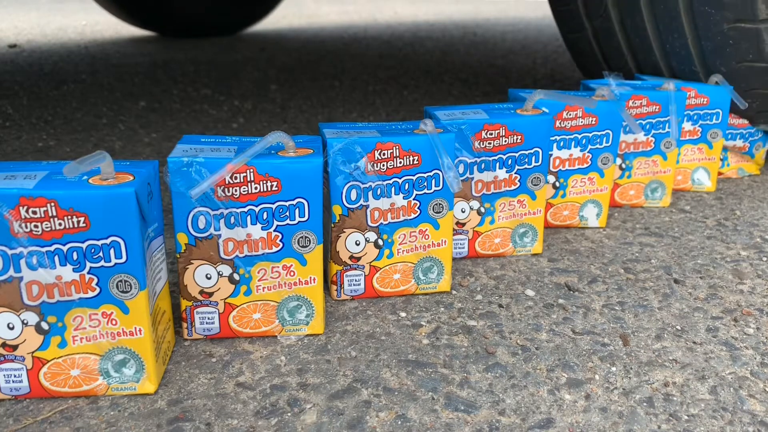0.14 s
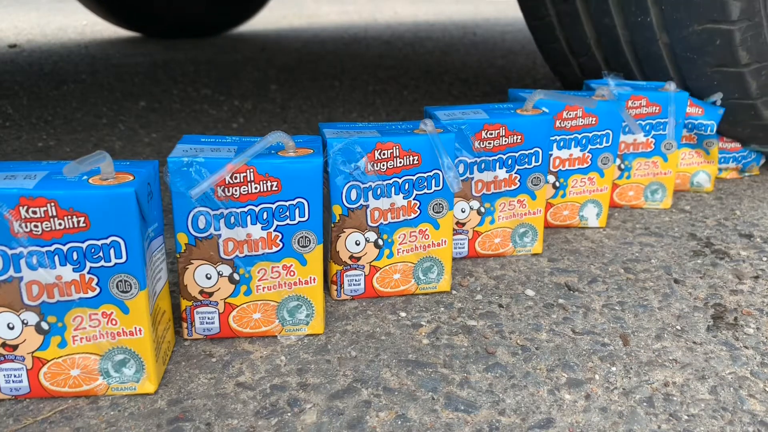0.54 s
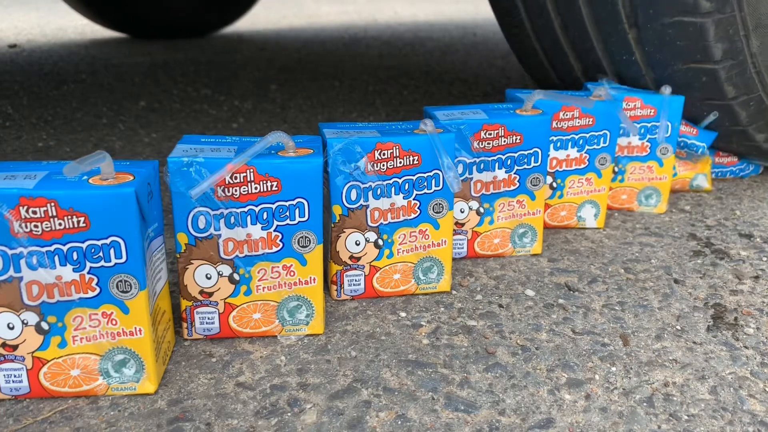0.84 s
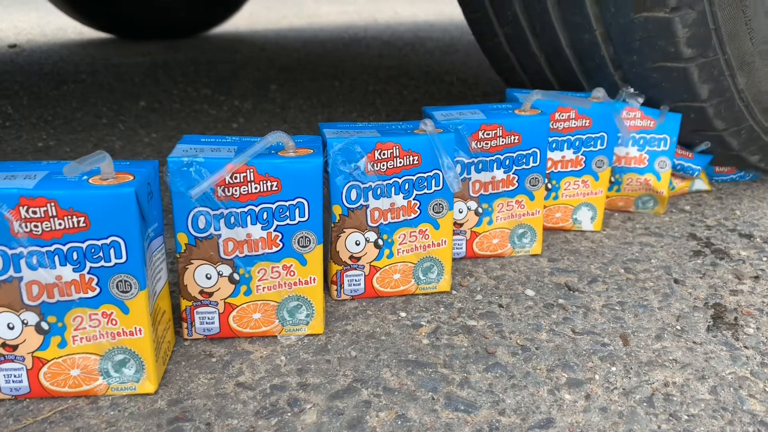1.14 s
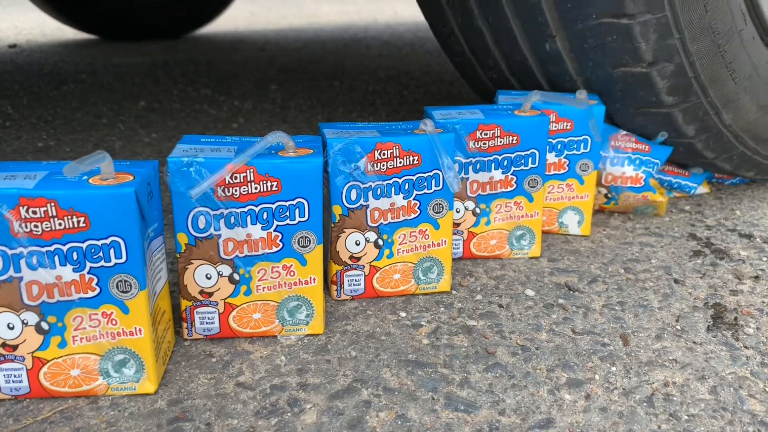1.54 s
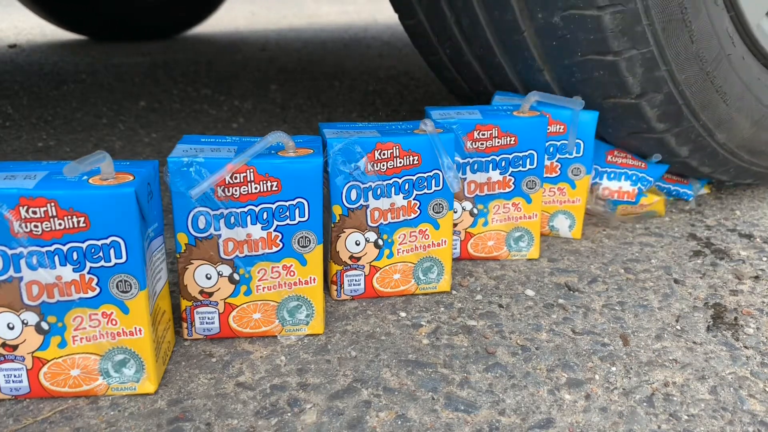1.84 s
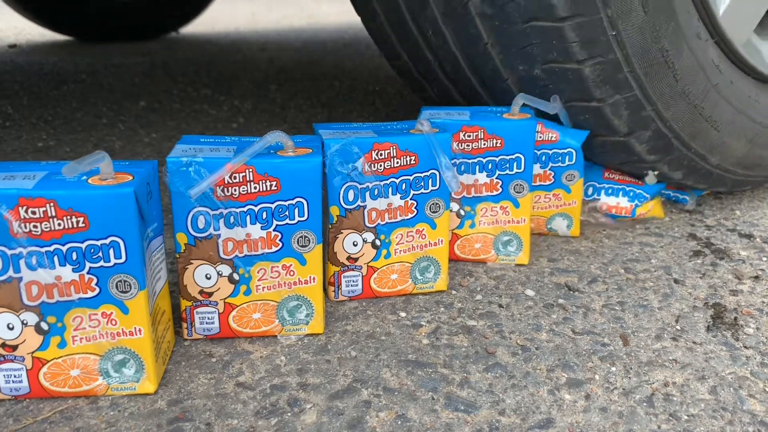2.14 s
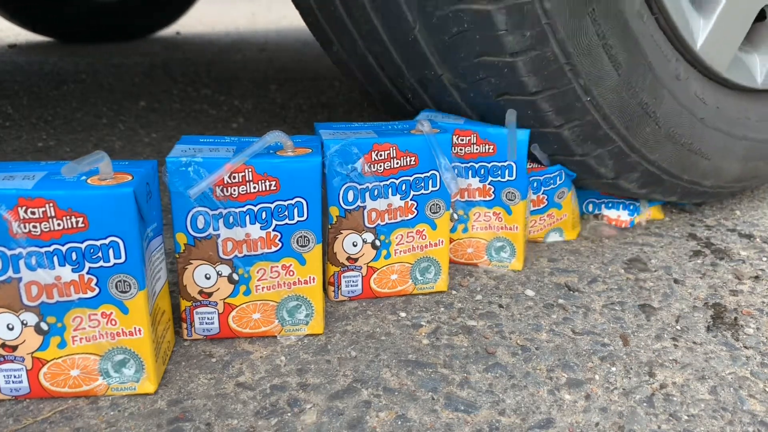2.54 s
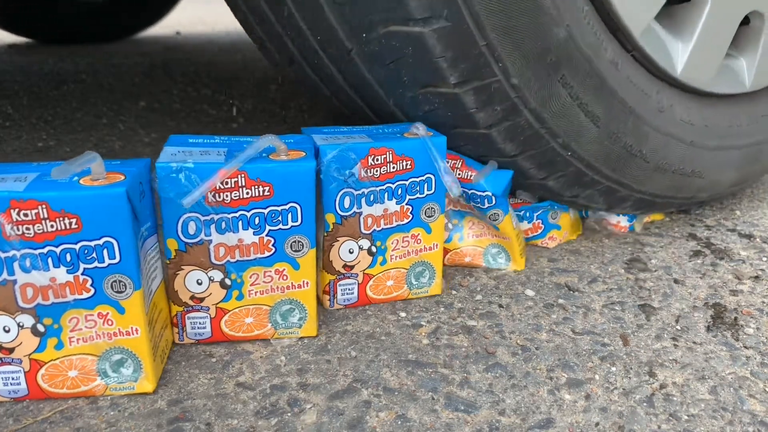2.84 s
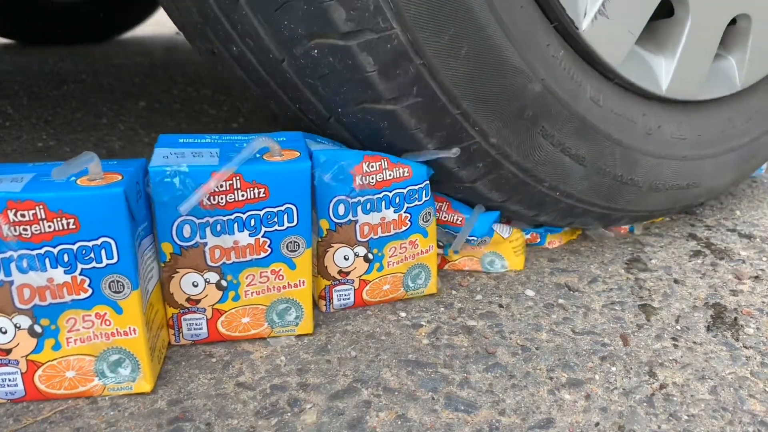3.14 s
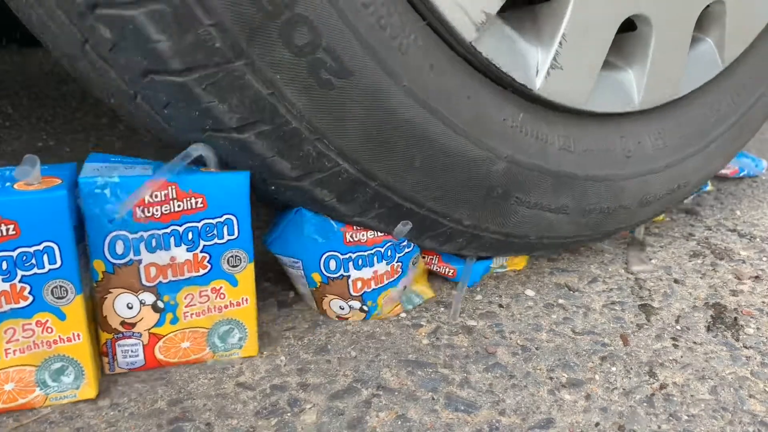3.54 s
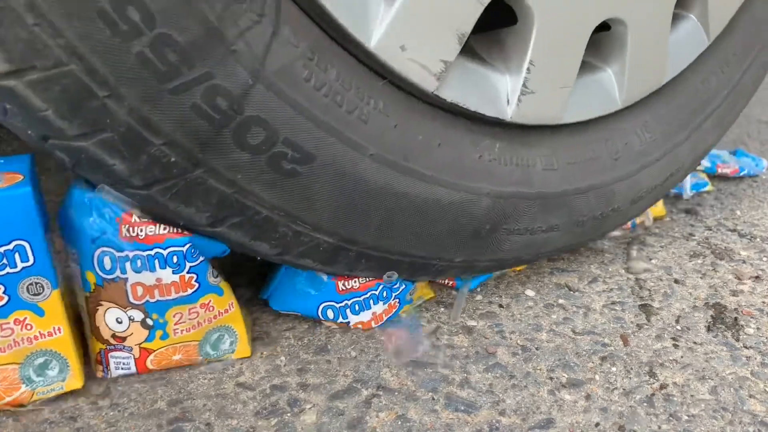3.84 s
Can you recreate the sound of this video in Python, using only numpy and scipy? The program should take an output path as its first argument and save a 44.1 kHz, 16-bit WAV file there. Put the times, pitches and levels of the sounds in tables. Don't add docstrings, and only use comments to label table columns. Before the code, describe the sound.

A car tyre creeps over full drink cartons on asphalt, close in stereo. Light crackles and hollow pops come first, then a quieter hissing lull, then louder bursts, sharp snaps and squirting juice, over faint street rumble.

```python
import sys
import numpy as np
from scipy import signal
from scipy.fft import rfft, irfft, next_fast_len
from scipy.io import wavfile
from scipy.ndimage import uniform_filter1d

SR = 44100
rng = np.random.default_rng(int(sys.argv[2]) if len(sys.argv) > 2 else 0)


def to_wav(sig):
    pcm = np.clip(np.atleast_2d(sig), -1, 1) * 32767
    pcm = np.round(pcm).astype(np.int16)
    wavfile.write(sys.argv[1], SR, pcm.T)


def invert_db(level):
    return 10 ** (np.asarray(level, dtype=float) / 20)


N = 176400

# frequency in Hz, level in dB.
JET_SPECTRUM = [(800, -2.5), (1500, 1), (2500, 4), (4000, 2.5), (6000, 1), (9000, 0.5), (13000, -5.5),
                (16000, -1.5)]


def rms_one(x):
    return x / np.sqrt(np.mean(x ** 2) + 1e-20)


def in_time(rows):
    s, *columns = np.transpose(rows)
    return [np.interp(np.arange(N) / SR, s, column) for column in columns]


def at_hz(points, hz):
    table_hz, values = np.array(points).T
    return np.interp(np.log(np.maximum(hz, 1)), np.log(table_hz), values)


def drift(rate):
    pole = np.exp(-40 * np.pi * rate / SR)
    white = rng.standard_normal(N // 20 + 3002)
    slow = signal.lfilter([1], [1, -2 * pole, pole * pole], white)[3000:]
    return np.interp(np.arange(N) / 20, np.arange(len(slow)), rms_one(slow))


def ring(clicks, hz, t60):
    radius = invert_db(-60 / (max(t60, 1e-3) * SR))
    w = 2 * np.pi * min(hz, 17000) / SR
    return signal.lfilter([0, np.sin(w)], [1, -2 * radius * np.cos(w), radius * radius], clicks + 1e-18)


def band(x, low_hz, high_hz):
    return signal.sosfilt(signal.butter(2, [low_hz, high_hz], "band", fs=SR, output="sos"), x)


def bank(low_hz, count, octaves, gain_db, patchy_db, rate, source=None):
    edges = low_hz * 2 ** (octaves * np.arange(count + 1))
    shared = drift(rate)
    if source is None:
        source = rng.standard_normal((2, N))
    out = 0
    for k in range(count):
        low, high = edges[k], edges[k + 1]
        flicker = patchy_db * (0.86 * shared + 1.44 * drift(rate * 0.75))
        out = out + invert_db(gain_db(np.sqrt(low * high)) + flicker) * band(source[k % 2], low, high)
    return out


def bump(hz, centre, octaves, db):
    return db * np.exp(-.5 * (np.log2(hz / centre) / octaves) ** 2)


def grains(rate, spread_db):
    sizes = invert_db(spread_db * np.minimum(rng.exponential(1, (2, N)), 4))
    sizes = sizes * rng.choice([-1, 1], (2, N))
    happens = rng.random((2, N)) < rate / SR
    return rms_one(sizes * happens + 1e-9)


def add(out, s, x):
    i = int(s * SR)
    out[i:i + len(x)] += x[:len(out) - i]


def street():
    # frequency in Hz, level in dB.
    rumble_spectrum = [(15, -42), (25, -62), (60, 8), (199, -7), (430, 6), (493, -5.5), (1500, -1.5),
                       (1950, -38), (3300, -120)]

    def rumble():
        return rms_one(bank(19.77, count=12, octaves=0.54, gain_db=lambda hz: at_hz(rumble_spectrum, hz),
                            patchy_db=4.5, rate=17.6))

    mid, side = rumble(), rumble()
    return invert_db(-47.5) * (mid + 0.21 * side * np.array([[1], [-1]]))


def jet_colour(hz, nozzle, whistle_db, extra_db=0):
    hiss_db = at_hz(JET_SPECTRUM, hz) + bump(hz, nozzle, octaves=.17, db=8 + extra_db)
    low_whistle_db = whistle_db - 17.0 + bump(hz, nozzle * 0.32, octaves=.22, db=25.9)
    return 10 * np.log10(invert_db(2 * hiss_db) + invert_db(2 * low_whistle_db))


def leak():
    # time in seconds, level in dB, nozzle resonance in Hz, brightness in dB per octave.
    seam_flow = [(0, -55.5, 9970, -4), (.45, -47.5, 9150, 5), (.66, -42, 14300, 2), (.95, -34, 12000, 5),
                 (1.1, -30.5, 12200, 9.5), (1.5, -34, 14000, 5.5), (1.7, -30, 9400, 5),
                 (1.92, -20, 10140, 2), (2.2, -26.5, 13600, 4.5), (2.55, -33.5, 14200, 0),
                 (2.62, -28.5, 10500, 1), (2.86, -20.5, 11500, 11.5), (2.93, -29, 11000, 9.5),
                 (3.11, -23, 13600, 11.5), (3.28, -38, 10300, -5), (3.5, -32, 11000, 4.5),
                 (3.8, -27.5, 11000, 3.5)]
    db, nozzle, tilt = in_time(seam_flow)

    def colour(hz):
        return jet_colour(hz, nozzle, whistle_db=-1.5) + tilt * np.log2(hz / 10000)

    return invert_db(db - 2.0) * bank(1034, count=24, octaves=1 / 6, gain_db=colour, patchy_db=1.5, rate=6)


def crumple():
    # time in seconds, creak level in dB, fold resonance in Hz, film crackle level in dB.
    load = [(0, -107, 475, -62), (.07, -45, 1040, -47), (.3, -35.5, 670, -38), (.5, -52.5, 830, -50),
            (.85, -36, 506, -42), (1.2, -47.5, 403, -47), (1.55, -41, 400, -41.5), (1.75, -56, 780, -34.5),
            (2.08, -50, 980, -30.5), (2.15, -29, 1050, -32.5), (2.5, -42.5, 810, -38.5),
            (2.8, -40, 387, -44), (3.15, -36.5, 886, -29.5), (3.22, -26, 524, -35), (3.5, -35.5, 850, -32),
            (3.66, -37, 1060, -34), (3.77, -37, 550, -32.5), (4, -28.5, 510, -30)]
    creaks_per_s, crackles_per_s = 2500, 700
    creak_db, fold, film_db = in_time(load)
    clump_db = np.minimum(5.0 * drift(25) + 3.7 * drift(120), 8)

    def fold_colour(hz):
        return bump(hz, fold, octaves=0.95, db=12.2) + bump(hz, 1500, octaves=1.0, db=2.03)

    def film_colour(hz):
        return bump(hz, 7150, octaves=0.84, db=10.0)

    creak = bank(131.8, count=14, octaves=1 / 3, gain_db=fold_colour, patchy_db=3.0, rate=25.0,
                 source=grains(creaks_per_s * invert_db(.4 * clump_db), spread_db=2.04))
    crackle = bank(1436, count=10, octaves=0.353, gain_db=film_colour, patchy_db=1.5, rate=90,
                   source=grains(crackles_per_s * invert_db(clump_db), spread_db=4.0))
    return invert_db(creak_db) * rms_one(creak), invert_db(film_db) * rms_one(crackle)


def snaps(rows, top_hz):
    out, t = np.zeros(N), np.arange(SR // 40) / SR
    for s, db, hz in rows:
        burst = rng.standard_normal(len(t)) * invert_db(-60 * t / 0.0095) * np.minimum(t / 0.00014, 1)
        t60 = 16.9 / hz
        x = ring(burst, hz, t60) + 0.072 * ring(burst, hz * 0.41, t60)
        x = x + 1.4 * band(burst, 1100, top_hz)
        add(out, s + 0.00123, invert_db(db) * x / np.abs(x).max())
    return out


def fold_ticks():
    # start in seconds, peak level in dB, pitch in Hz.
    small_folds = [(0.064, -28.5, 1250), (0.083, -30, 1130), (0.1, -37, 727), (0.116, -22, 1290),
                   (0.163, -16, 1220), (0.177, -17, 740), (0.234, -28.5, 720), (0.317, -26, 735),
                   (0.366, -23, 1020), (0.404, -23.5, 1300), (0.412, -31, 1270), (0.436, -39, 1170),
                   (0.521, -26, 745), (0.742, -31, 960), (0.795, -23, 703), (0.903, -27, 2300),
                   (0.953, -28, 1010), (0.997, -5, 820), (1.518, -30.5, 830), (2.12, -24, 3900),
                   (2.145, -28.5, 1060), (2.162, -18.5, 1180), (2.2, -13.5, 1030), (2.232, -18.5, 880),
                   (2.359, -23, 764), (2.488, -26, 1030), (2.57, -12, 767), (2.61, -10, 3500),
                   (3.37, -12, 880), (3.473, -16, 905), (3.529, -26.5, 1020), (3.561, -15, 1170),
                   (3.567, -14, 1095), (3.584, -19, 1230), (3.607, -14, 1210), (3.885, -11.5, 2800),
                   (3.964, -5, 935)]
    return invert_db(-0.5) * snaps(small_folds, top_hz=3000)


def film_prickles():
    # start in seconds, peak level in dB, pitch in Hz.
    small_slips = [(0.0742, -40, 4950), (0.0883, -23, 8020), (0.1999, -27, 7500), (0.246, -23, 9150),
                   (0.297, -27, 8000), (0.374, -25, 5100), (0.4085, -31, 4960), (0.4366, -38, 4510),
                   (0.675, -29, 9190), (0.6923, -26, 6550), (0.7786, -21, 7560), (0.8904, -23, 10700),
                   (0.952, -20, 10000), (1.1534, -30, 12000), (3.9014, -7, 9910)]
    return snaps(small_slips, top_hz=12000)


def film_snaps():
    # start in seconds, peak level in dB, pitch in Hz.
    tears = [(0.132, -19, 6230), (0.1775, -9, 7340), (0.2712, -13.5, 8400), (0.3442, -21, 7500),
             (0.366, -19, 8000), (0.6486, -19, 14000), (0.797, -16.5, 7360), (0.903, -17.5, 8500),
             (0.935, -16, 13900), (1, -15, 12000), (2.3719, -4, 8000), (2.4135, -5.5, 8640),
             (2.573, -1, 11100), (3.0102, 0.5, 11800), (3.5651, -3, 8500), (3.7986, -16, 6600)]
    return snaps(tears, top_hz=11000)


def pops():
    # start in seconds, peak level in dB, hollow pitch in Hz, ring T60 in seconds.
    buckles = [(0.179, -19, 310, 0.083), (0.542, -8.5, 620, 0.015), (0.684, -14, 674, 0.011),
               (0.793, -22, 271, 0.039), (0.993, -13, 308, 0.013), (1.079, -11.5, 664, 0.026),
               (1.32, -25.5, 322, 0.066), (1.61, -22, 440, 0.029), (2.575, -1.5, 670, 0.012),
               (2.663, -6, 764, 0.0073), (2.769, -25, 337, 0.065), (2.906, -2, 794, 0.01),
               (3.18, -17.5, 620, 0.01), (3.315, -16, 750, 0.02), (3.472, -14, 530, 0.014),
               (3.797, -16, 425, 0.063), (3.87, -15.5, 400, 0.085), (3.96, -6, 654, 0.041)]
    # frequency ratio to the hollow pitch, level in dB, share of the ring time.
    wall_modes = [(.5, -11.5, 1.24), (1.0, -2, 1.11), (1.3, -3, 1.05), (2.1, -26, 0.16)]
    out, t = np.zeros(N), np.arange(SR // 5) / SR
    tail_decay = invert_db(-60 * t / .1)
    thud = invert_db(-23 - 60 * t / 0.0317) * np.sin(2 * np.pi * 108 * t)
    for s, db, hz, t60 in buckles:
        a, b = rng.standard_normal((2, len(t)))
        along = np.minimum(t * hz / 2.46, 1)
        sagging = np.sin(2 * np.pi * hz * t * (1.15 - 0.28 * along))
        push = np.sin(np.pi * along) ** 2 * (sagging + .3 * a)
        body = 0
        for k, (ratio, mode_db, share) in enumerate(wall_modes):
            body = body + invert_db(mode_db + 5 * b[k]) * ring(push, hz * ratio, t60 * share)
        tail = invert_db(-13) * tail_decay * along * rms_one(band(b, hz / 2, 2 * hz))
        tail = tail / rms_one(tail_decay)[0]
        crack = invert_db(4.0 - 60 * t / 0.011) * along * rms_one(band(a, 850, 1700))
        add(out, s + 0.00233, invert_db(db) * (body / np.abs(body).max() + tail + thud + crack))
    return out


def squirts():
    # start in seconds, length in seconds, level in dB, nozzle resonance in Hz,
    # low whistle level in dB, body level in dB.
    bursts = [(0.789, 0.0034, -33.5, 9700, -14, 0), (0.99, 0.029, -20, 12900, -34, -3.5),
              (1.144, 0.02, -29, 11100, -24, -41), (2.593, 0.13, -25, 10860, 19, -25),
              (2.754, 0.13, -25.5, 12300, 4, -24), (3.052, 0.16, -30.5, 8460, -18, -37),
              (3.331, 0.01, -21, 11700, -1.5, -23), (3.352, 0.0066, -23, 11600, -5, -12),
              (3.365, 0.11, -22.5, 11000, 4.5, -10), (3.402, 0.014, -15, 11000, 6, -26),
              (3.416, 0.011, -12.5, 9540, 6, -20), (3.855, 0.1, -20, 9300, -27, -20)]
    jet, rush, n = np.zeros(N), np.zeros(N), SR // 4
    t, hz = np.arange(n) / SR, np.fft.rfftfreq(n, 1 / SR) + 1
    splutter = invert_db(2.2 * drift(130))
    body_colour = invert_db(bump(hz, 1130, octaves=1.3, db=20.3))
    for s, length, db, nozzle, whistle_db, body_db in bursts:
        a, b = rng.standard_normal((2, n))
        shape = np.minimum(t / (0.24 * length), 1) * np.exp(-np.maximum(t - length, 0) / .013)
        colour = invert_db(jet_colour(hz, nozzle, whistle_db + 4.5, extra_db=4.5))
        add(jet, s, invert_db(db) * shape * rms_one(irfft(rfft(a) * colour, n)))
        add(rush, s, invert_db(db + body_db + 3.0) * shape * rms_one(irfft(rfft(b) * body_colour, n)))
    return jet * splutter, rush * splutter


def crease_cracks():
    # start in seconds, peak level in dB, pitch in Hz.
    creases = [
        (1.3214, -17.5, 918),
        (3.1832, -4, 1630),
        (3.9004, -8, 1490),
    ]
    return snaps(creases, top_hz=3500)


def ports(cardboard, jets):
    # frequency in Hz, left over right level in dB.
    balance = [(300, -.5), (1050, -6), (1900, 0), (2900, .8), (5500, 4), (6500, 0)]
    # frequency in Hz, phase in turns.
    jet_lead = [(100, .01), (1000, .33), (2400, .5), (3100, .56), (4200, .92), (5600, 1.5), (7000, 2.15),
                (8800, 2.2), (12000, 2)]
    # time in seconds, lag of the left port in ms,
    # left over right level in dB, share of the jets heard from near by (0 to 1).
    wheel = [(0, 0.31, -2.5, 0.19), (.5, 0.29, -2.5, 0.077), (2, 0.27, -2.5, 0.089), (2.6, .26, -3, 0.26),
             (3.2, 0.2, 1.5, 0.58), (3.8, 0.06, 3, 0.56)]
    n, sign = next_fast_len(N + SR // 8), np.array([[1], [-1]])
    hz, i = np.fft.rfftfreq(n, 1 / SR), np.arange(N)
    late_ms, left_db, near = in_time(wheel)
    near = np.clip(near + 0.61 * drift(5.0), 0, 1)
    half_lag = late_ms * SR / 2000
    lagged = [np.interp(i - k * half_lag, i, cardboard) for k in (1, -1)]
    moving = invert_db(sign * left_db / 2) * lagged

    def led(x, ratio):
        turns = at_hz(jet_lead, hz * ratio)
        return np.exp(-1j * np.pi * turns * (sign + 1)) * rfft(x, n)

    both = rfft(moving, n) + led(jets * (1 - near), 0.99) + led(jets * near, 0.853)
    direct = irfft(invert_db(sign * at_hz(balance, hz) / 2) * both, n)[:, :N]
    scatter = rng.standard_normal(N) * invert_db(-7.5)
    scatter_colour = invert_db(at_hz(JET_SPECTRUM, hz)) / (1 + (hz / 10000) ** 20.0)
    hiss = irfft(rfft(scatter, n) * scatter_colour, n)[:N]
    level = uniform_filter1d(np.abs(jets), size=64) * 0.34
    echo = np.roll(cardboard, int(0.003997 * SR)) * invert_db(-10)
    return direct + sign * level * hiss + [[1], [0]] * echo


def scene():
    creak, crackle = crumple()
    jet, rush = squirts()
    film = film_snaps() + film_prickles() + crackle
    film_in_walls = 0.5 * band(film, 910, 4200)
    cardboard = pops() + crease_cracks() + fold_ticks() + creak + rush + film_in_walls
    return ports(band(cardboard, 73, 21500), film + leak() + jet) + street()


def band_limit(x):
    return signal.sosfilt(signal.butter(12, 16960, fs=SR, output="sos"), x)


def record(dry):
    soft = .9 * np.tanh(dry / .9)
    cut = signal.sosfilt(signal.cheby2(12, 60, 16500, fs=SR, output="sos"), soft)
    return band_limit(cut)


dry = scene()
out = record(dry)
to_wav(out)
```